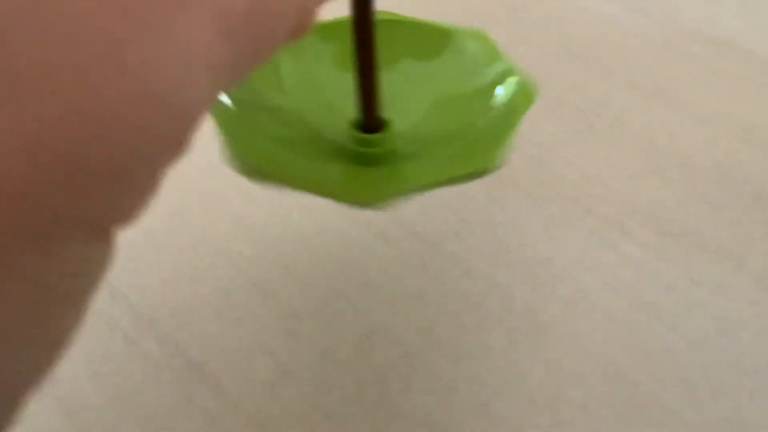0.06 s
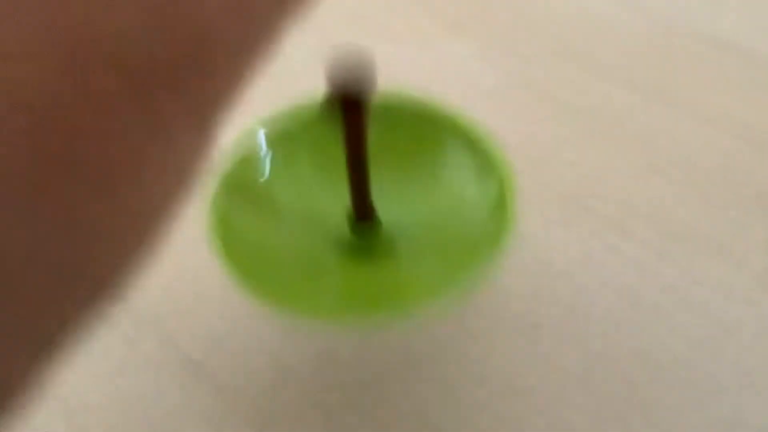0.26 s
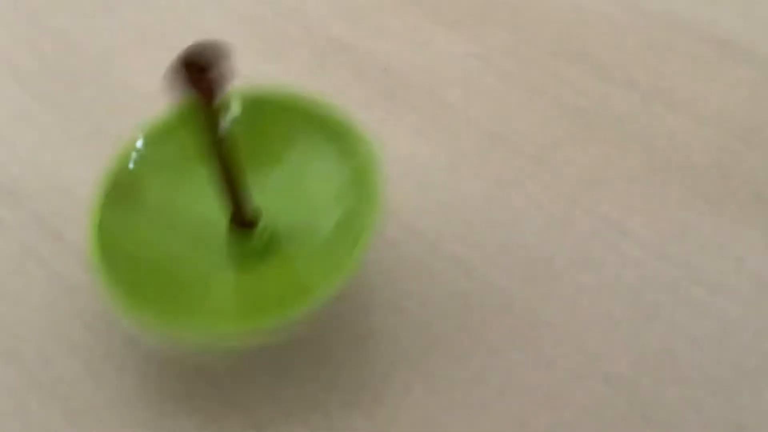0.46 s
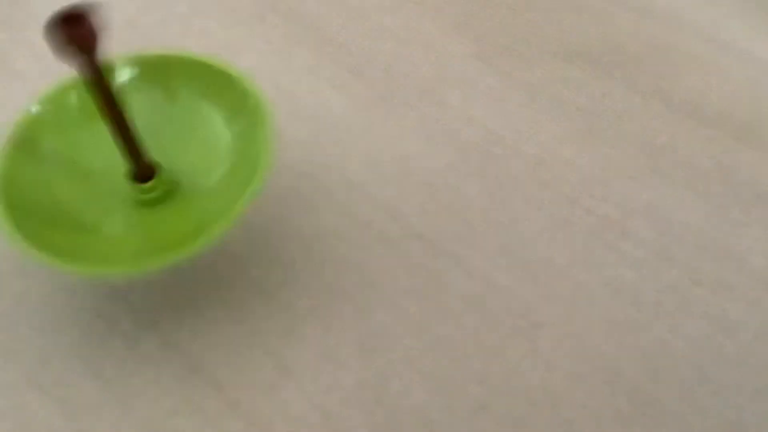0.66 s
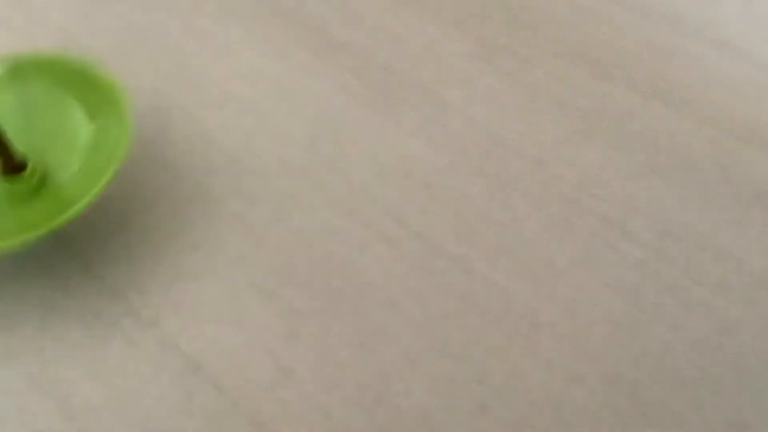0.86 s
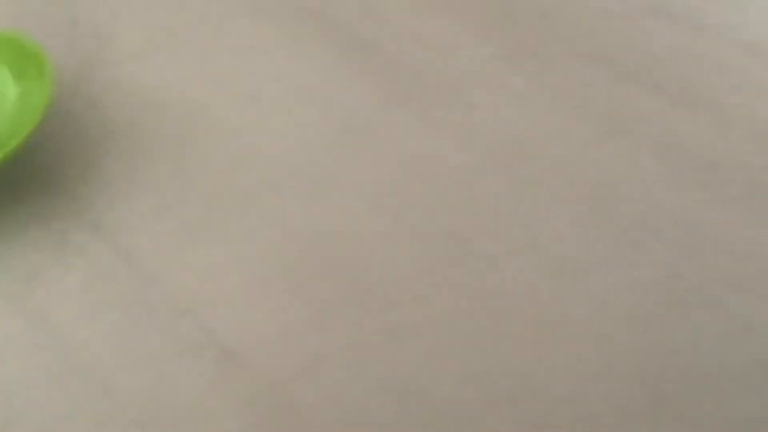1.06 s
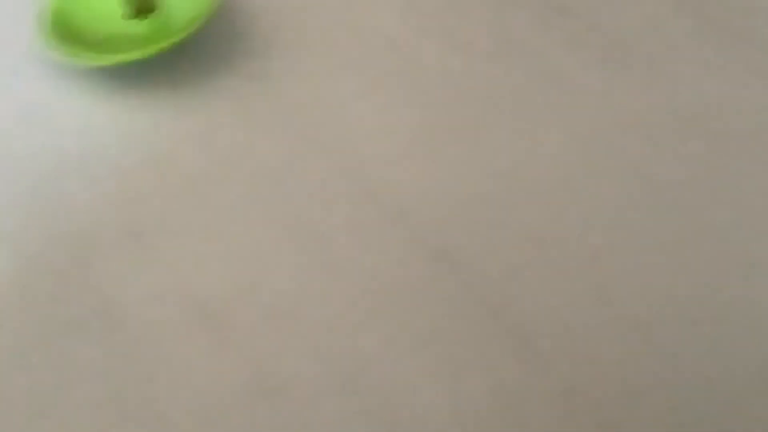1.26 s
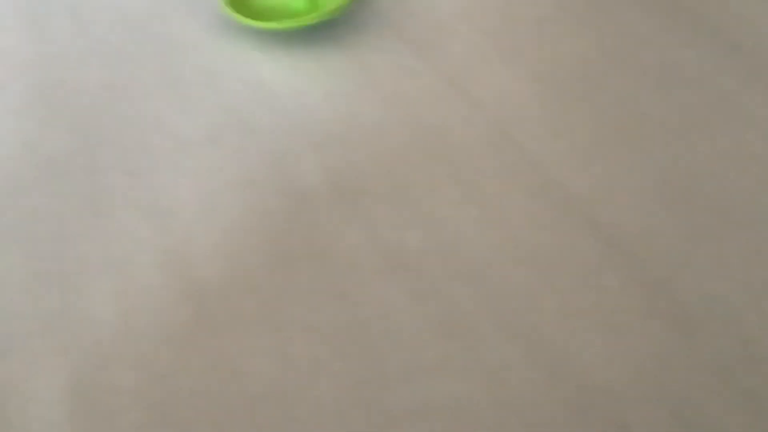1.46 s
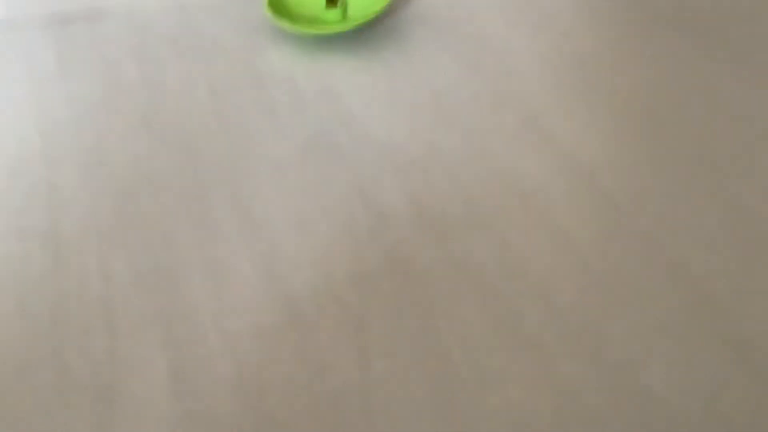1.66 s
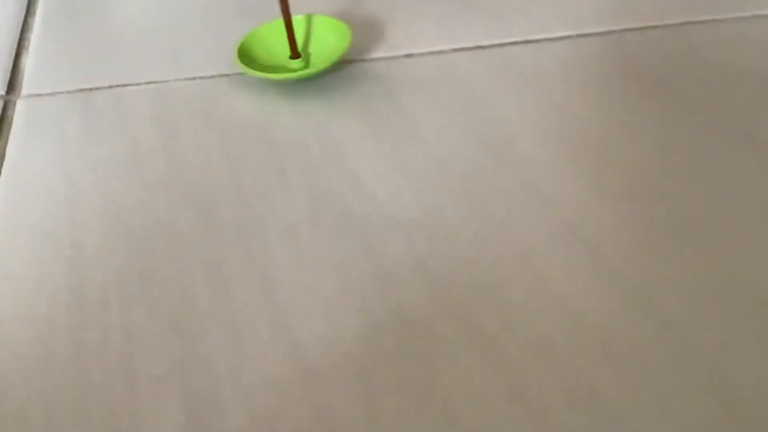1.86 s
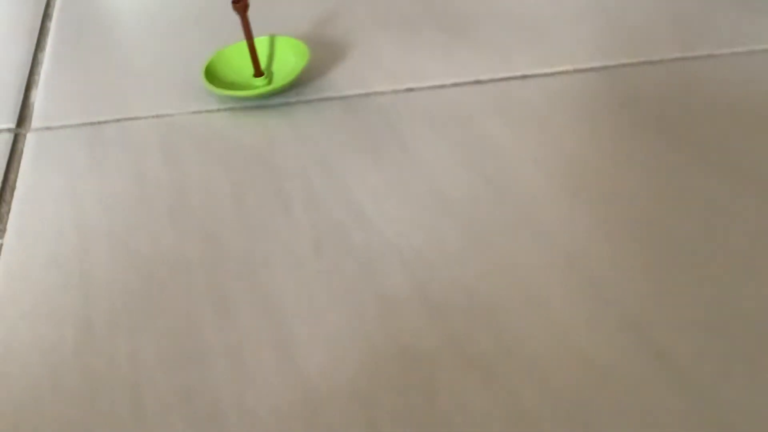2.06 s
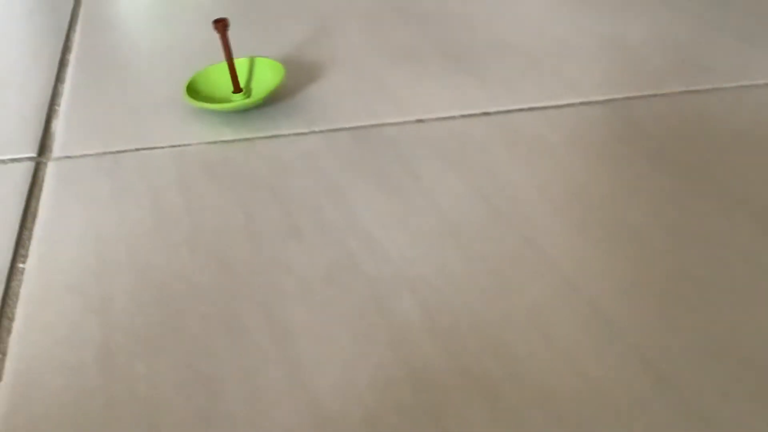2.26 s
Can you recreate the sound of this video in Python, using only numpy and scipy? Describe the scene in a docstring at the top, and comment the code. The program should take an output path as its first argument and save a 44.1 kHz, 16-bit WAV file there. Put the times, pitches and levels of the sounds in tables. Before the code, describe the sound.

Small plastic top bounces on tile, ringing clicks speeding up into a faint buzz.

```python
"""A hard room with a tiled floor, where a small plastic top is dropped spinning close to the microphone.
It slips from the fingers and bounces ever faster, each blow a tick and a short ring of its bowl, until
the tip chatters in a buzz; later it hops again at a tile joint. Handling bumps, rumble and a brief low
hum pass as the microphone follows it. The room answers faintly over quiet air."""
import sys
import numpy as np
from scipy import signal
from scipy.fft import rfft, irfft
from scipy.io import wavfile
from scipy.ndimage import uniform_filter1d

SR = 44100
rng = np.random.default_rng(int(sys.argv[2]) if len(sys.argv) > 2 else 0)


def file_out(sig):
    """Save sig as 16-bit WAV at sys.argv[1]."""
    # one column per channel
    cols = np.atleast_2d(sig).T
    # limit, then scale
    lim = np.clip(cols, -1, 1)
    pcm = np.round(lim * 32767).astype(np.int16)
    wavfile.write(sys.argv[1], SR, pcm)


N = 105840
TIME = np.arange(N) / SR


def undb(db):
    return 10 ** (np.asarray(db) / 20)


def unit(x):
    """Scale to rms 1."""
    return x / np.sqrt(np.mean(x ** 2))


def curve(points, t):
    """Gain of a (time [s], level [dB]) envelope at the times t."""
    return undb(np.interp(t, *np.array(points, float).T))


def gains(colour, size):
    """Gain of a (frequency [Hz], level [dB]) colour on the bins of a transform."""
    hz, db = np.array(colour, float).T
    return undb(np.interp(np.log(np.fft.rfftfreq(size, 1 / SR) + 1), np.log(hz), db))


def tint(x, colour):
    """Equalise a full-length signal with a colour."""
    return irfft(rfft(x) * gains(colour, N), N)


def noise(colour):
    """Coloured noise of rms 1."""
    return unit(tint(rng.standard_normal(N), colour))


def fade(t, t60):
    """Exponential decay, 60 dB down at t60."""
    return np.exp(-np.log(1000) * t / t60)


def pulse(colour, size=512):
    """Sharpest causal click of a colour; its envelope peaks at 1."""
    cepstrum = irfft(np.log(gains(colour, size)))
    cepstrum[1:size // 2] *= 2
    cepstrum[size // 2 + 1:] = 0
    click = irfft(np.exp(rfft(cepstrum)))
    return click / np.abs(signal.hilbert(click)).max()


def add(out, start, x):
    """Mix x in at start [s]."""
    i = int(np.clip(start * SR, 0, N))
    out[i:i + len(x)] += x[:N - i]


# Dark colour of the room tone (frequency [Hz], level [dB])
AIR_COLOUR = [(30, -6), (80, 0), (650, -0.5), (1000, -6), (1700, -20), (12000, -32.5)]


def air(level_db=-67):
    """A quiet bed of air under the whole scene."""
    return undb(level_db) * noise(AIR_COLOUR)


# Bright hiss of the stem between the fingers (frequency [Hz], level [dB])
HISS_COLOUR = [(1800, -18), (8000, 1), (15000, -1.5)]


def slide(start_s=.1168, end_s=.2, hiss_db=-58.5, release_db=-37):
    """A dry tick as the fingers let the stem go, then a faint hiss as it slides out."""
    gate = uniform_filter1d(1. * ((TIME > start_s) & (TIME < end_s)), size=60)
    release = undb(release_db) * fade(np.maximum(TIME - start_s, 0), t60=.016)
    return noise(HISS_COLOUR) * gate * (undb(hiss_db) + release)


# Tick of the tip on the tile (frequency [Hz], hard-hit level [dB], soft-hit level [dB])
TICK_COLOUR = [(668, -23.5, -13), (1783, -14, -6), (2450, -7.5, -0.5), (2663, -2, 1.5), (3500, 2, -2),
               (4240, 1, -9.5), (6080, -13.5, -13.5), (6850, -17, -37.5), (10570, -40, -40)]
# Bright crack of the plastic (frequency [Hz], level [dB])
CRACK_COLOUR = [(5000, -53), (8500, -12.5), (9800, -17.5), (11000, -2), (13300, -2.5), (14600, -5.5),
                (16000, -15.5)]
# Thud of the tile (frequency [Hz], level [dB])
THUD_COLOUR = [(80, 4), (300, 1.5), (1050, 8), (1330, -11), (1650, -8.5), (4000, -19)]
# Trim on the thud, which gives the first landings their weight (time [s], level [dB])
THUD_TRIM = [(.58, 2.5), (.68, 1.5), (1.0, -33), (1.4, -48)]


def impact(t, start, hard, tick_db, high_db):
    """The attack of a blow: tick, crack and thud. Hard hits are brighter, with a brief noisy tail."""
    grit = unit(rng.standard_normal(len(t)) * fade(t, t60=.014))
    contact = hard * undb(-3) * grit / np.sqrt(len(t))
    contact[0] = 1
    colour = [(hz, soft_db + hard * (hard_db - soft_db)) for hz, hard_db, soft_db in TICK_COLOUR]
    tick = undb(tick_db + 3) * pulse(colour)
    crack = undb(high_db - 13.5 + 10 * hard) * pulse(CRACK_COLOUR)
    thud = undb(tick_db - 17.5) * curve(THUD_TRIM, start) * pulse(THUD_COLOUR)
    out = signal.fftconvolve(contact, tick + crack)[:len(t)]
    add(out, 0, thud)
    return out


RING_HZ = 5272
RISE_SOFT_S, RISE_HARD_S = .00079, .00036
# Modes of the bowl (frequency [Hz], level [dB], soft-hit t60 [s], group [0 main, 1 middle, 2 high])
BOWL_MODES = [(RING_HZ, 0, .031, 0), (5296, -18, .065, 0), (6918, -1, .028, 1), (8290, -4.5, .021, 2),
              (10870, -8.5, .014, 2), (11200, -3, .019, 2), (11720, -17, .010, 2), (14800, -8, .017, 2)]


def bowl_ring(t, hard, ring_db, middle_db, high_db, scatter_db=2.5, detune=.00087):
    """The struck bowl rings. Hard hits speak faster and die sooner; soft ones start the main ring flat."""
    rise_s = RISE_SOFT_S + hard * (RISE_HARD_S - RISE_SOFT_S)
    swell = 1 - np.exp(-(t / rise_s) ** 2)
    pitch_sag = (1 - hard) * .037 * np.exp(-t / .00071)  # while the contact lasts
    bent_time = np.cumsum(1 - pitch_sag) / SR
    out = np.zeros(len(t))
    for hz, db, t60, group in BOWL_MODES:
        strength, tuning = rng.standard_normal(2)
        group_db = (ring_db, middle_db, high_db)[round(group)]
        level_db = db + group_db + scatter_db * strength * (group > 0)
        cycles = hz * (1 + detune * tuning) * (t if group else bent_time) + rng.random()
        envelope = swell * fade(t, t60 * (1 - .22 * hard))
        out += undb(level_db) * envelope * np.sin(2 * np.pi * cycles)
    return out


def blow(start, tick_db, ring_db, high_db, soft_db=-33, hard_db=-8.5):
    """One hit of the tip, impact plus ring; the tick level sets how hard it sounds."""
    t = np.arange(3300) / SR
    hard = np.clip((tick_db - soft_db) / (hard_db - soft_db), 0, 1)
    middle_db = tick_db - 20.5 + 12.5 * hard
    return impact(t, start, hard, tick_db, high_db) + bowl_ring(t, hard, ring_db, middle_db, high_db)


# Landings of the tip (time [s], tick level [dB], main ring level [dB], crack and high-mode level [dB])
LANDINGS = [(0.201, -3.5, -6, -4), (0.339, -3.5, -8.5, -6), (0.4624, -3, -6, -5), (0.5757, -3.5, -8, -6),
            (0.6796, -6, -1, -8), (0.7722, -6, -4.5, -6.5), (0.8556, -7.5, -3, -11), (0.924, -18, -49, -57),
            (0.9297, -8, -2.5, -15), (0.9921, -8.5, -7.5, -14.5), (1.0525, -12.5, -5.5, -15.5),
            (1.106, -10, -7, -17.5), (1.151, -11.5, -7.5, -21.5), (1.1949, -19, -8.5, -27),
            (1.226, -17.5, -11, -28), (1.2541, -17.5, -10, -26.5), (1.2822, -25.5, -12, -33.5),
            (1.3016, -23, -12.5, -32), (1.3192, -32, -20.5, -36), (1.336, -25.5, -16.5, -39),
            (1.3526, -26.5, -17.5, -38), (1.368, -34, -24, -39), (1.3801, -29.5, -20, -37),
            (1.392, -30.5, -29, -39), (1.401, -33.5, -27, -45), (1.4299, -35, -26.5, -48),
            (1.4366, -36, -21, -53), (1.4509, -35.5, -28.5, -47), (1.4815, -40, -30.5, -57),
            (1.4882, -40, -33.5, -50), (1.5542, -37.5, -32, -60), (1.5701, -38, -31, -46),
            (1.6649, -40.5, -32, -46), (1.6952, -37.5, -32, -45.5), (1.7016, -39, -27, -55),
            (1.713, -40.5, -33, -55), (1.9135, -47, -29.5, -55), (1.9222, -33.5, -20.5, -45),
            (1.9395, -30.5, -22, -43), (1.9556, -31, -25, -40), (1.9714, -27.5, -19.5, -38),
            (1.9862, -28.5, -17.5, -32.5), (2.0004, -31, -21.5, -39), (2.0145, -39.0, -29.5, -46),
            (2.0244, -37, -30.5, -49), (2.0332, -37, -31.5, -52), (2.069, -38, -34, -49),
            (2.1631, -42, -32.5, -50), (2.3099, -47, -41, -49)]


def bounces():
    """The top bounces faster and softer, then hops again at the tile joint."""
    out = np.zeros(N)
    for start, tick_db, ring_db, high_db in LANDINGS:
        add(out, start, blow(start, tick_db, ring_db, high_db))
    return out


# Accents of the stem on two early landings (time [s], level [dB])
STEM_CLACKS = [(.201, -8), (.5756, -14)]


def clacks(hz=4270, t60=.012):
    """The stem knocks in its socket with one short, high note."""
    t = np.arange(N // 40) / SR
    swell = 1 - np.exp(-(t / RISE_HARD_S) ** 2)
    clack = swell * fade(t, t60) * np.sin(2 * np.pi * hz * t)
    out = np.zeros(N)
    for start, db in STEM_CLACKS:
        add(out, start, undb(db) * clack)
    return out


# Knocks on the microphone (time [s], level [dB], half-width [s], pitch [Hz])
HANDLING_BUMPS = [(0.85, -45, 0.011, 95.2), (0.967, -52.5, 0.014, 114), (1.0777, -28, 0.00055, 1760),
                  (1.078, -27, 0.0022, 650), (1.098, -29, 0.0015, 720), (1.124, -26.5, 0.0049, 249.4),
                  (1.142, -22, 0.0028, 181), (1.181, -27, 0.0025, 517), (1.184, -22.5, 0.0054, 198),
                  (1.208, -28, 0.0062, 97.4), (1.3, -37.5, 0.0094, 92.4)]
# Swell of the handling rumble (time [s], level [dB])
RUMBLE_LEVEL = [(1.04, -47), (1.08, -37.5), (1.18, -33), (1.25, -44), (1.33, -47.5), (1.42, -79)]
# Bass-heavy rub of the hand (frequency [Hz], level [dB])
RUB_COLOUR = [(70, -3), (220, 0), (330, -8.5), (600, -11), (2000, -20.5), (15000, -36)]


def handling(rub_db=-3, rub_above_hz=220):
    """Hollow bumps and rumble as the microphone moves; the higher bumps carry some rubbing noise."""
    rub = noise(RUB_COLOUR)
    out = rub * curve(RUMBLE_LEVEL, TIME) * (TIME > RUMBLE_LEVEL[0][0])
    for centre, db, width, hz in HANDLING_BUMPS:
        tone = np.sqrt(2) * np.sin(2 * np.pi * (hz * TIME + rng.random()))
        knock = tone + undb(rub_db) * rub * (hz > rub_above_hz)
        out += undb(db) * knock * np.exp(-.5 * ((TIME - centre) / width) ** 2)
    return out


# Two swells of the hum (time [s], level [dB])
HUM_LEVEL = [(1.24, -60), (1.31, -41), (1.425, -42), (1.487, -57), (1.515, -42), (1.545, -46), (1.575, -82)]


def hum(hz=68.5):
    """A brief low hum as the handling ends."""
    tone = np.sqrt(2) * np.sin(2 * np.pi * hz * TIME)
    return tone * curve(HUM_LEVEL, TIME) * (TIME > HUM_LEVEL[0][0])


# Force of the chattering tip, which also drives the rolling rustle (time [s], level [dB])
CHATTER_LEVEL = [(1.37, -44), (1.49, -44.5), (1.56, -43.5), (1.625, -63), (1.665, -46), (1.715, -47),
                 (1.77, -51), (1.805, -68), (1.835, -54.5), (1.87, -68.5), (2.02, -44.5), (2.08, -44),
                 (2.12, -50), (2.195, -54), (2.225, -48), (2.28, -54), (2.34, -49.5), (2.4, -64)]
CHATTER_START_S = CHATTER_LEVEL[0][0]


def chatter(hops=200, rate_hz=138.6, rise_hz_per_s=48, jitter=.25, scatter_db=2.7):
    """Tiny, quickening hops of the tip blur into a buzz; they pause around each distinct landing."""
    out = np.zeros(N)
    landing_times = np.array(LANDINGS)[:, 0]
    start = CHATTER_START_S
    for gap, strength, ring in rng.standard_normal((hops, 3)):
        start += np.exp(jitter * gap) / (rate_hz + rise_hz_per_s * (start - CHATTER_START_S))
        tick_db = 20 * np.log10(curve(CHATTER_LEVEL, start)) + scatter_db * strength
        hop = blow(start, tick_db, ring_db=tick_db + 6 + scatter_db * ring, high_db=tick_db - 10.5)
        if np.abs(landing_times - start).min() > .004:
            add(out, start, hop)
    return out


# Rustle of the tip on the glaze (frequency [Hz], level [dB])
GLAZE_COLOUR = [(900, -13.5), (2300, -3), (3700, -37), (4300, 3.5), (5100, 5.5), (6200, -26)]


def rolling(joint_s=1.91):
    """The tip rustles on the glaze as it chatters, more so beyond the tile joint."""
    force = curve(CHATTER_LEVEL, TIME) * (TIME > CHATTER_START_S)
    trim_db = np.where(TIME < joint_s, -14.5, -11.5)
    return noise(GLAZE_COLOUR) * force * undb(trim_db)


# Colour of the reverb (frequency [Hz], level [dB])
REVERB_COLOUR = [(100, 2), (600, 6.5), (1500, 4), (4400, 1.5), (5270, 0.5), (6200, -0.5), (8300, 2),
                 (11200, 2.5), (13200, -2)]


def room(x, early_db=-20, tail_db=-21, echoes_per_s=300, predelay_s=.0027):
    """The hard room returns sparse early reflections and a diffuse tail that loses its treble first."""
    def decay(t60):
        return unit(fade(TIME, t60)) / np.sqrt(N)

    wash = tint(unit(rng.standard_normal(N)), REVERB_COLOUR)
    spikes = rng.standard_normal(N) * (rng.random(N) < echoes_per_s / SR)
    early = undb(early_db) * tint(unit(spikes), REVERB_COLOUR) * decay(t60=.16)
    body = signal.sosfiltfilt(signal.butter(2, 7000, fs=SR, output="sos"), wash)
    treble = wash - body
    tail = undb(tail_db) * (body * decay(t60=1) + treble * decay(t60=.45))
    out = np.zeros(N)
    add(out, predelay_s, signal.fftconvolve(x, early + tail)[:N])
    return out


def scene():
    """Mono mix: the top feeds the room; handling, hum and air stay dry."""
    top = slide() + bounces() + clacks() + chatter() + rolling()
    return (top + room(top) + handling() + hum() + air())[None]


def record(dry, lag_cycles=1.121, low_cut_hz=68.2, ceiling=.87, high_cut_hz=16100):
    """The microphone delays and thins the bass, rounds the highest peaks and cuts the extreme treble."""
    hz = np.fft.rfftfreq(2 * N, 1 / SR)
    bass_lag = np.exp(-2j * np.pi * lag_cycles * np.log((hz + 10) / (hz + 3000)))
    x = irfft(rfft(dry, 2 * N) * bass_lag)[:, :N]
    x = signal.sosfilt(signal.butter(4, low_cut_hz, "high", fs=SR, output="sos"), x)
    x = x / (1 + (x / ceiling) ** 4) ** .25
    return signal.sosfilt(signal.ellip(8, .2, 70, high_cut_hz, fs=SR, output="sos"), x)


dry = scene()
out = record(dry)
file_out(out)
```